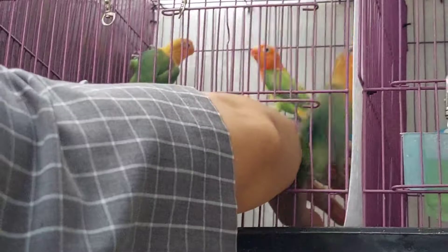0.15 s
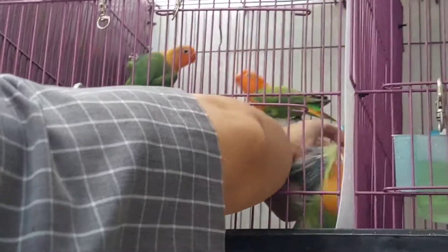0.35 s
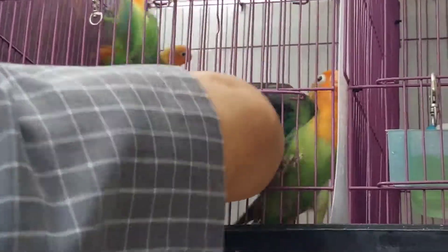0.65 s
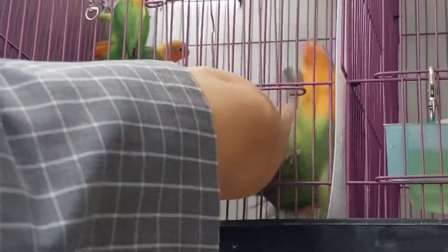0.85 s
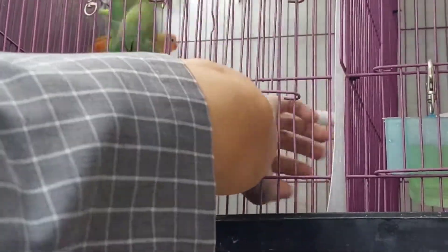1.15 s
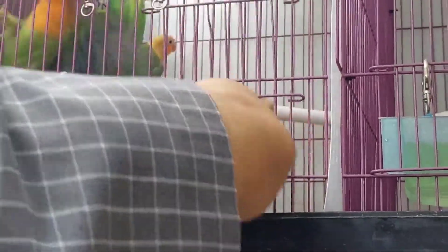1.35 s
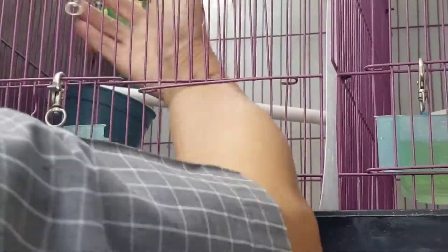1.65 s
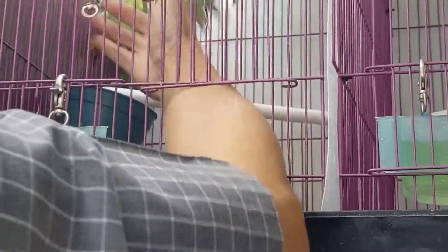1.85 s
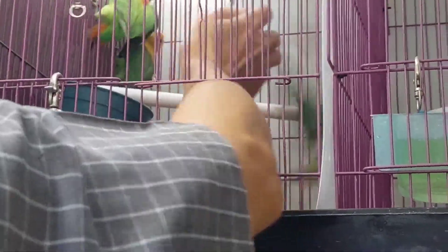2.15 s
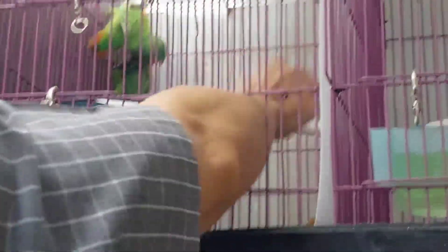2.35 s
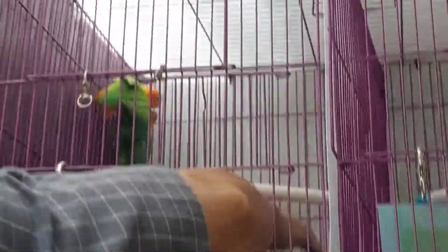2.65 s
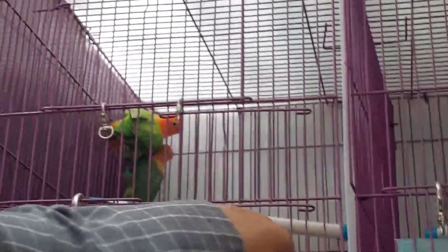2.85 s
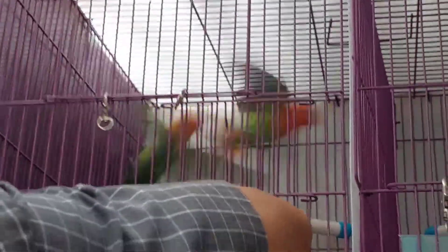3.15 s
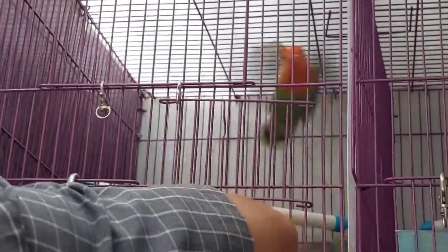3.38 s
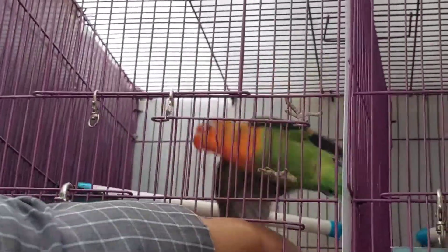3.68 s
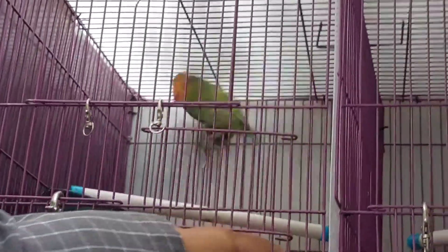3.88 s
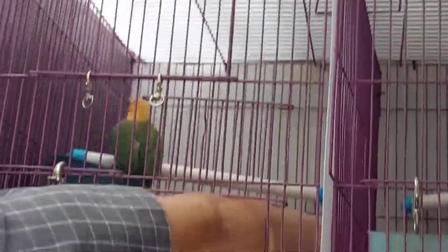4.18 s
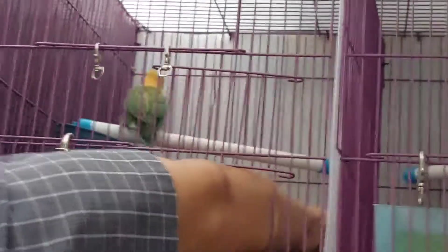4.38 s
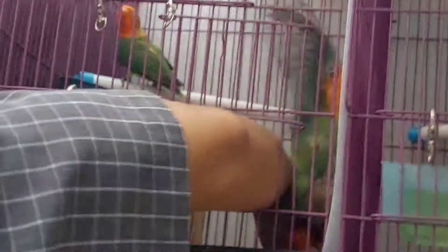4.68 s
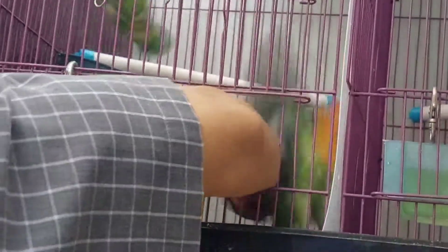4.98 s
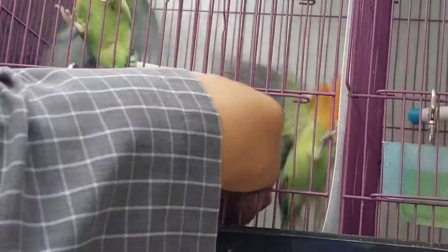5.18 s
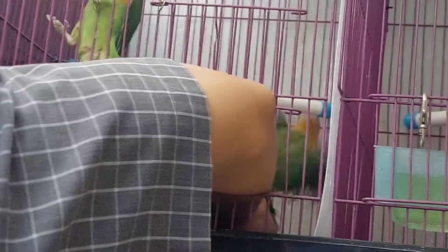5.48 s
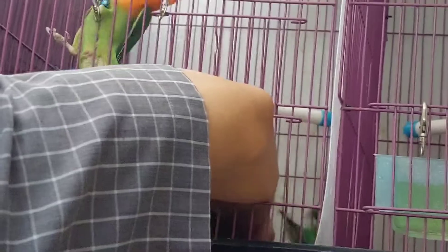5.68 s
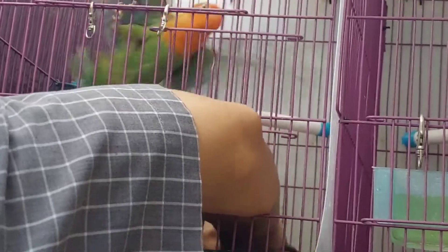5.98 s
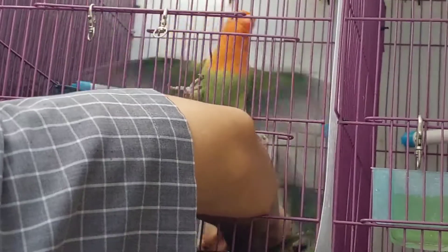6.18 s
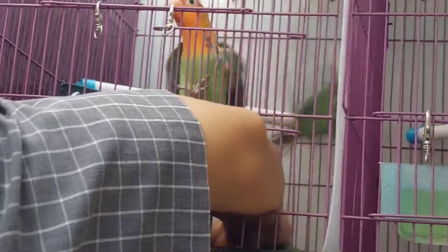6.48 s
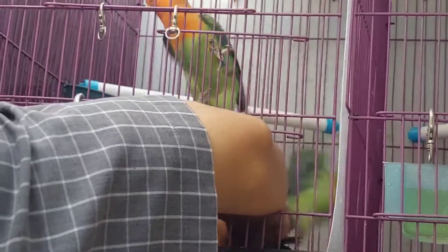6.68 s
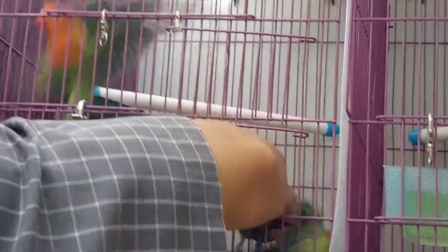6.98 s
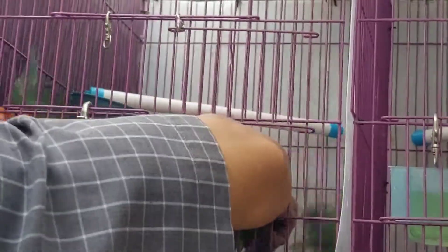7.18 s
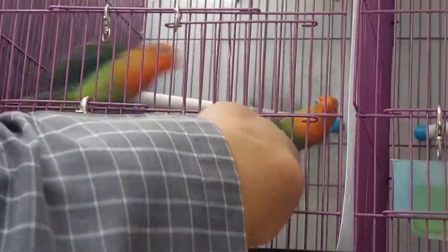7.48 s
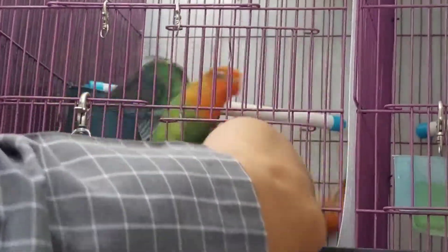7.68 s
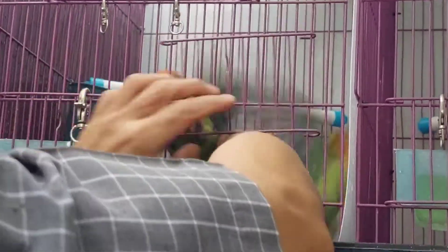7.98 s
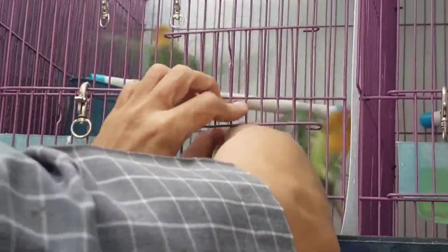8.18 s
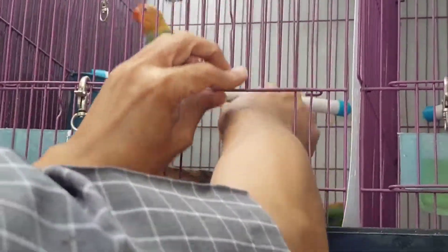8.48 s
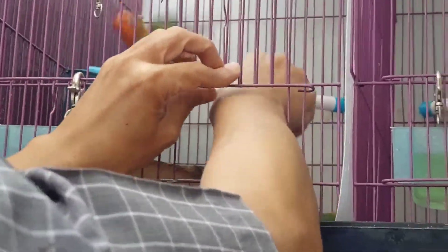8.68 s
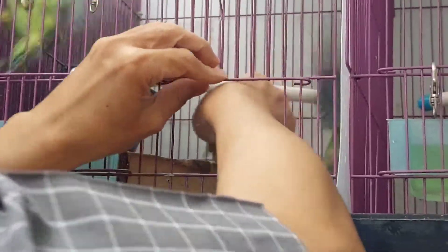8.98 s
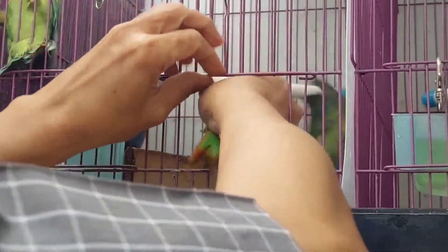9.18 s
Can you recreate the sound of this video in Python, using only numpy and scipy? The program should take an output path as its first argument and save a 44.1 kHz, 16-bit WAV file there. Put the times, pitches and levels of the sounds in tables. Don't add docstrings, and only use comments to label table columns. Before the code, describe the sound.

In a hard-walled room, small parrots panic in a wire cage very near two microphones. Two raspy rising screeches open at 0 and 0.3 s, with wing blows between them, then a short call at 1.05 and another at 1.7. A second bird gives leaping, purer whistles at 2.1 and 2.3. Screeches return at 2.6, 2.9, 3.2 and 3.8, with a dense flurry of slaps around 3.5-3.8 and a brief high chirp near 4.0. A tiny claw squeak on wire at 4.7 precedes rapid screeching from 4.8 to 8.2, wings slapping bars and thumping the tray, notably around 7.4-7.7. A faint, very high whistle comes at 8.25, more blows at 8.8-9.0, final screeches at 9.0 and 9.3. Airy flutter and feather rustle fill gaps. One distant engine fades by 1.3 s; another swells to about 4 and disappears by 5.5, over soft low room noise.

```python
import sys
import numpy as np
from scipy import signal
from scipy.fft import rfft, irfft, next_fast_len
from scipy.io import wavfile
from scipy.ndimage import uniform_filter1d

SR = 44100
rng = np.random.default_rng(int(sys.argv[2]) if len(sys.argv) > 2 else 0)


def generate_wav(sig):
    pcm = np.round(np.clip(np.atleast_2d(sig).T, -1, 1) * 32767).astype(np.int16)
    wavfile.write(sys.argv[1], SR, pcm)


def ratio_of_db(decibels):
    return 10 ** (np.asarray(decibels, float) / 20)


N = 411894

# t/s, firing f/Hz, level/dB, upper orders level/dB
DRONE = [
    (0.0, 63.9, -62, -58),
    (1.15, 67.45, -43, -48),
    (3.84, 62.94, -33, -51.5),
    (5.5, 63.5, -105, -57),
]
# multiple of firing f, level/dB
DRONE_ORDERS = [(2, 5), (2.5, -16), (3, 0)]
# t/s, f/Hz, level/dB
PASSING_ENGINE = [
    (0.0, 85, -45),
    (1.26, 84.5, -60),
    (1.3, 83, -68),
]
# f/Hz, level/dB
FLOOR = [(15, -34), (25, -10), (65, 11), (158, -2.5), (431, -7), (922, -30), (1240, -32.5), (1390, -21.5),
         (4570, -48.5), (14300, -41), (16400, -48.5)]
# f/Hz, likeness (0-1)
LIKENESS = [(60, .97), (170, .92), (330, .66), (640, .12), (15000, .02)]

# t/s, wing air level/dB, feather contact with the wire level/dB
FLUTTER = [(0.29, -31, -22), (0.88, -59, -14.5), (1.15, -45, -13.5), (2.35, -36.5, -15), (2.56, -51, -24),
           (2.7, -37.5, -22), (3.12, -48.5, -8), (3.33, -32, -5), (4.04, -35.5, -27), (4.62, -53.5, -15),
           (4.71, -31.5, -15.5), (5.53, -35.5, -16), (6.01, -48, -10), (6.8, -34.5, -11.5),
           (8.17, -39.5, -16), (8.8, -53, -16), (9.05, -27, -15.5), (9.3, -44.5, -18)]
# f/Hz, level/dB
WING_AIR = [(53, -10), (100, -2), (294, -0.5), (881, -12.5), (2500, -16.5), (4000, -62.5)]
# f/Hz, level/dB
FEATHERS = [(530, 9), (900, 0), (2000, 6.5), (2490, -2.5), (2820, 3.5), (7170, -4), (15200, -2),
            (16400, -49)]

# t/s, length/s, effort level/dB, low f/Hz, top f/Hz
SCREECHES = [(0.021, 0.17, -10, 1617, 2890), (0.332, 0.16, -14.5, 1642, 3055),
             (1.049, 0.053, -25.5, 2102, 2695), (1.678, 0.13, -15.5, 1643, 2846),
             (2.603, 0.2, -19, 1400, 3026), (2.926, 0.2, -19, 1470, 2766), (3.214, 0.18, -21, 1539, 2758),
             (3.845, 0.16, -17, 1728, 2648), (4.835, 0.19, -14.5, 1537, 2688),
             (5.147, 0.125, -13.5, 1658, 2516), (5.42, 0.095, -16, 1652, 2615),
             (5.777, 0.15, -16, 1568, 2785), (6.297, 0.19, -19.5, 1406, 2857),
             (6.61, 0.074, -11.5, 1710, 2492), (6.842, 0.15, -15, 1517, 2795),
             (7.152, 0.17, -17.5, 1532, 2662), (7.426, .13, -16, 1490, 2685),
             (7.835, 0.14, -18, 1470, 2594), (8.117, 0.12, -17, 1439, 2523),
             (8.994, 0.18, -15.5, 1504, 2768), (9.307, 0.13, -17.5, 1476, 2700)]
# low note/s, rise/s, last f as share of top, overtone level/dB, windpipe ring level/dB
GLIDES = [(0.045, 0.085, 0.81, -3.5, -2.5), (0.025, .11, 0.68, -5.5, -3), (0.02, 0.033, 1, -6, 12.5),
          (0.038, 0.039, 0.55, -3.5, 2), (0.075, 0.075, 0.6, -1, 1.5), (0.041, .11, 1, -3.5, -1),
          (0.05, 0.1, 0.46, -2, 0.5), (0.055, .068, 0.69, -2, -1), (0.08, 0.065, 0.68, -0.5, 0.5),
          (0.033, 0.061, 0.6, -2.5, 0), (0.032, 0.041, 0.85, -6, -1), (0.062, .052, .6, -5, -0.5),
          (0.065, 0.088, 0.75, -5.5, 8), (.042, 0.034, 1, -3.5, -5.5), (0.023, .115, 0.33, -4, -0.5),
          (0.066, 0.059, .9, -5, 1.5), (0.044, .065, 0.9, -5, -0.5), (0.054, 0.042, 0.98, -5.5, -2),
          (0.037, 0.06, 0.63, -2.5, -1.5), (.066, 0.069, 0.3, -4.5, 8.5), (0.034, 0.055, .85, -3, 7)]
# peak as share of rise, start level/dB, sag/dB, fundamental level/dB
PUSHES = [(0.037, -22.5, -13, -6), (0.17, -16.5, -5, -10.5), (0.46, -15, -1, -11),
          (0.24, -8.5, -10.5, -8.5), (0.15, -19, -4.5, -11), (0.32, -12, -1, -6.5), (0.12, -3, -3.5, -10),
          (0.18, -3.5, -1.5, -10), (0.22, -20, -5, -6), (0.67, -21, -11.5, -6.5), (0.64, -11.5, -9.5, -4.5),
          (1, -18, -1, -11.5), (.3, -15, -6, -7.5), (0.46, -19.5, -4.5, -8.5), (0.22, -10.5, -2.5, -7),
          (0.4, -16, -4.5, -10.5), (0.92, -18, -2.5, -13), (0.27, -15.5, 1, -14.5), (0.68, -16, -3, -9.5),
          (0.23, -12, -5, -10.5), (.3, -13, -3.5, -10)]
LATENESS = [1.8, 1.8, 1.8, 1.5, 2.2, 1.8, 2.2, 1.4, 1.8, 1.6, 1.8, 2.2, 1.8, 1.8, 1.8, 1.8, 1.8, 1.8, 1.8,
            3.6, 1.8]
HASTE = [1.7, 3, 1.7, 1.3, 1.3, 1.4, 0.89, 1.2, 1.2, 1.1, 1.5, 1.4, 1.2, 1.3, 1, 1.3, 1.2, 1.3, 1.3, 1.3,
         1.3]
ROUGHNESS = [.55, .55, .43, .43, .4, .4, .45, .4, .4, .38, .36, .32, .24, .4, .4, .38, .32, .3, .38, .22,
             .3]
CHOP_RATES = [230, 270, 270, 270, 230, 250, 270, 270, 270, 270, 270, 250, 270, 270, 270, 270, 200, 100, 270,
              130, 270]
# f/Hz, level/dB
THROAT = [(590, -60), (1150, -30.5), (1450, -3.5), (2240, -7), (3040, -2.5), (4730, -2), (5600, -10),
          (6400, -12), (9220, -18), (10600, -14.5), (13900, -13.5), (15800, -39), (16400, -53)]

# t/s, feather snap level/dB, thump relative to it/dB
BLOWS = [(0.2432, -25, -2), (0.3184, -24, -3.5), (1.037, -19, -11.5), (1.2801, -25.5, -6),
         (1.5569, -31, -13), (1.6614, -24.5, -1), (2.1893, -26.5, -7), (2.6142, -26, -2),
         (3.1664, -25.5, -1), (3.5512, -21.5, -4), (3.6072, -20, -6), (3.6701, -30, 5), (3.8291, -22.5, -9),
         (4.1045, -25, -5.5), (4.2437, -22, -4.5), (4.6629, -27, 2), (4.7921, -18.5, -7),
         (5.3956, -21.5, -11), (6.3048, -18.5, -6.5), (6.6187, -22.5, -3), (7.364, -23.5, -1),
         (7.4067, -25.5, 0), (7.671, -25.5, 2), (7.707, -22.5, 5), (7.722, -27, -2), (8.101, -21, -2.5),
         (8.5613, -38.5, 1), (8.8286, -23, -8.5), (8.8819, -39, 9.5), (8.8934, -23.5, -60),
         (8.9706, -24, -15), (2.6005, -34.5, -18), (8.9575, -30, -10)]
# t/s, feather snap level/dB
BRUSHES = [(0.6519, -30.5), (0.988, -34), (1.16, -28), (1.211, -30), (1.353, -28.5), (1.4339, -52),
           (1.499, -28.5), (1.627, -30), (1.933, -27.5), (2.0443, -23.5), (2.27, -27.5), (3.459, -19),
           (3.9953, -18), (4.023, -17.5), (4.314, -35), (4.419, -36.5), (1.79, -20), (1.82, -20.5),
           (5.257, -29), (5.3336, -32), (6.097, -33), (5.648, -57), (5.73, -57), (6.047, -44), (6.156, -26),
           (6.217, -37), (6.759, -27.5), (6.8197, -19), (7.135, -30.5), (8.2412, -18.5), (9.2853, -32.5)]
# f/Hz, level/dB, t60/s
TRAY_MODES = [(219.4, 1, 0.35), (307.2, 0, 0.31), (406.5, 1, 0.2), (591, -2.5, 0.21), (875, 7, 0.068),
              (1380, 7.5, 0.04)]

# t/s, effort level/dB, f/Hz, rasp (0-1)
WHISTLES = [
    [(2.058, -24, 2200, .95), (2.086, -18.5, 2856, .6), (2.096, -12.5, 2894, .1), (2.099, -5.5, 4330, .1),
     (2.113, -11.5, 4215, .1), (2.117, -13, 4820, .1), (2.138, -10.5, 4280, .15), (2.142, -18.5, 2997, .1),
     (2.16, -26.5, 2965, .15)],
    [(2.303, -21.5, 2030, .5), (2.315, -20, 2800, .4), (2.318, -8, 3790, .15), (2.336, -15, 4250, .15),
     (2.353, -15.5, 4450, .15), (2.366, -16.5, 3400, .2), (2.374, -10.5, 3894, .1),
     (2.392, -17.5, 4030, .15), (2.405, -32, 4250, .15)],
    [(4.031, -10, 4570, 0.9), (4.041, -28, 4590, 0.6), (4.051, -13, 5810, 0.4), (4.07, -20.5, 5290, 0.3),
     (4.077, -35.5, 5020, 0.3)],
    [(8.257, -24, 5660, .2), (8.266, -22, 6285, .1), (8.28, -24, 6190, .1), (8.3, -19, 6220, .1)],
]
# second level/dB, third level/dB
WHISTLE_OVERTONES = [(-13, -16.5), (-13, -15), (-13.5, -31.5), (0, -40)]

# t/s, length/s, slip f/Hz, level/dB
SQUEAK = (4.736, .028, 762, -38)
# f/Hz, level/dB
SQUEAK_COLOUR = [(700, -25), (1530, -2), (5300, -8), (12800, -17)]

# f/Hz, t60/s
ROOM = [(200, 0.99), (2000, 0.52), (5000, 0.5), (12000, 0.46)]
# f/Hz, left-right level/dB
SHADOW = [(240, -2), (950, -1.5), (3770, -.5), (15000, -3)]


def evened(x):
    return x / np.sqrt(np.mean(x ** 2) + 1e-20)


def read(points, hz):
    f, value = np.transpose(points)
    return np.interp(np.log(hz + 1), np.log(f + 1), value)


def add(mix, s, sound):
    part = mix[..., round(s * SR):][..., :sound.shape[-1]]
    part += sound[..., :part.shape[-1]]


def curve(rows):
    s, *columns = np.transpose(rows)
    t = np.arange(s[0], s[-1], 1 / SR)
    return [np.interp(t, s, c) for c in columns]


def whole(rows):
    s, *columns = np.transpose(rows)
    return [np.interp(np.arange(N) / SR, s, c) for c in columns]


def drift(count, hz):
    size = next_fast_len(max(count, SR // 4), real=True)
    spectrum = rfft(rng.standard_normal(size))
    smooth = np.exp(-(np.fft.rfftfreq(size, 1 / SR) / hz) ** 2)
    return evened(irfft(spectrum * smooth, size)[:count])


def hiss(points, patchy_db):
    frames, hz = N // 128 + 5, np.fft.rfftfreq(512, 1 / SR)
    a, b, c, d, patches = rng.standard_normal((frames, 257, 5)).T
    patches = uniform_filter1d(patches, size=10, axis=0)
    patches = evened(uniform_filter1d(patches, size=8, axis=1))
    same = np.clip(read(LIKENESS, hz), -1, 1)[:, None]
    left = a + 1j * b
    right = same * left + np.sqrt(1 - same ** 2) * (c + 1j * d)
    z = np.array([left, right]) * ratio_of_db(read(points, hz)[:, None] + patchy_db * patches)
    return evened(signal.istft(z, nperseg=512, noverlap=384)[1][:, :N])


def engines():
    out = np.zeros(N)
    hz, db, upper_db = curve(DRONE)
    turns = np.cumsum(hz) / SR
    upper = sum(ratio_of_db(order_db) * np.sin(2 * np.pi * k * turns) for k, order_db in DRONE_ORDERS)
    tone = ratio_of_db(db + 5.0) * np.sin(2 * np.pi * turns) + ratio_of_db(upper_db) * upper
    waver = ratio_of_db(2.2 * drift(count=len(hz), hz=3.7))
    add(out, 0, tone * waver * signal.windows.tukey(len(hz), .05))
    hz, db = curve(PASSING_ENGINE)
    tone = ratio_of_db(db + 9) * np.sin(2 * np.pi * np.cumsum(hz) / SR)
    add(out, 0, tone * signal.windows.tukey(len(hz), .2))
    return out


def flutter():
    air_db, contact_db = whole(FLUTTER)
    beat_db = 3 * drift(count=N, hz=40)
    lumps_db = np.clip(2.4 * drift(count=N, hz=25), -5, 3.5)
    air = ratio_of_db(air_db - 2.5 + lumps_db) * hiss(WING_AIR, patchy_db=1.0)
    rustle = ratio_of_db(air_db + contact_db + 9.5 + beat_db) * hiss(FEATHERS, patchy_db=2.0)
    return air + rustle


def breath(count):
    size = next_fast_len(max(count, SR // 4), real=True)
    air = rfft(rng.standard_normal(size))
    throat = ratio_of_db(read(THROAT, np.fft.rfftfreq(size, 1 / SR)))
    return evened(irfft(air * throat, size)[:count])


def contour(length, effort_db, low_hz, top_hz, held, glide, last, ring_db,
            peak_at, start_db, sag_db, late, haste):
    attack_s, held_db = 0.028, -6.5
    ring_hz, ring_width_hz, pull = 2216, 190, .95
    t = np.arange(0, length, 1 / SR)
    up = np.clip((t - held) / glide, 0, 1)
    up = 1 - (1 - up) ** max(haste, 1)
    down = np.clip((t - held - glide) / max(length - held - glide, .005), 0, 1) ** late

    peak = held + np.clip(peak_at, .02, 1) * glide
    times = [0, min(attack_s, held), peak, max(length, peak + .005)]
    shape_db = np.interp(t, times, [start_db, held_db, 0, sag_db])

    low_hz = low_hz * (1 + .06 * np.minimum(t / held, 1))
    hz = (low_hz + (top_hz - low_hz) * up) * (1 - (1 - last) * down)
    off = (hz - ring_hz) / ring_width_hz
    surge_db = 0.7 * drift(count=len(t), hz=45.4)
    shape_db = shape_db + ring_db * np.exp(-off ** 4) + surge_db
    caught = pull * np.clip(0.397 + ring_db / 13, 0, 1) * np.exp(-(off / 2) ** 4)
    return effort_db + shape_db, hz - caught * (hz - ring_hz)


def screech(effort_db, hz, rough, chop_hz, low_db, high_db):
    n = len(hz)
    rough = np.clip(rough * (2200 / hz), .15, 1)
    hz = hz * (1 + .068 * rough * drift(count=n, hz=350) + .022 * drift(count=n, hz=70))
    turns = np.cumsum(hz) / SR
    chop_turns = np.cumsum(chop_hz * (1 + 0.2934 * drift(count=n, hz=58.8))) / SR
    chop = np.cos(2 * np.pi * chop_turns)
    tone = 0
    for k in range(1, 10):
        tilt_db = low_db if k == 1 else high_db * (k > 2)
        tilt_db = tilt_db + 3.2 * drift(count=n, hz=45)
        level = ratio_of_db(read(THROAT, k * hz) + tilt_db) * (k * hz < 17000)
        flicker = 1 + rough * (1.97 * chop + 0.19 * drift(count=n, hz=253))
        tone = tone + level * flicker * np.cos(2 * np.pi * k * turns)
    tone = tone / np.sqrt(uniform_filter1d(tone ** 2, size=900) + 1e-9)
    puffs = (1 + 2.8 * chop) * breath(count=n)
    voice = tone + ratio_of_db(-15.0 + 2 * high_db) * rough * puffs
    return ratio_of_db(effort_db + 0.5) * voice * signal.windows.tukey(n, .08)


def placed(call, pan_db, direct_db):
    left_at, right_at = 21, 4
    t = np.arange(900) / SR
    turn = np.linspace(0, np.pi / 2, len(call))
    out = 0
    for fade in (np.cos(turn), np.sin(turn)):
        sparse = rng.random((2, 900)) < .08
        walls = rng.standard_normal((2, 900)) * sparse * ratio_of_db(-60 * t / 0.05)
        walls *= ratio_of_db(2.0) / np.linalg.norm(walls, axis=1, keepdims=True)
        walls[0, left_at] += ratio_of_db(direct_db + pan_db / 2)
        walls[1, right_at] += ratio_of_db(direct_db - pan_db / 2)
        out = out + signal.fftconvolve((call * fade)[None], walls, axes=1)
    return out


def screeches():
    out = np.zeros((2, N))
    rows = zip(SCREECHES, GLIDES, PUSHES, LATENESS, HASTE, ROUGHNESS, CHOP_RATES)
    for (s, *call), (*glide, high_db, ring_db), (*push, low_db), late, haste, rough, chop_hz in rows:
        effort_db, hz = contour(*call, *glide, ring_db, *push, late, haste)
        voice = screech(effort_db, hz, rough, chop_hz, low_db, high_db)
        add(out, s, placed(voice, pan_db=4, direct_db=-8.0))
    return out


def slaps():
    snap, thump = np.zeros(N), np.zeros(N)
    t = np.arange(6000) / SR
    strokes = BLOWS + [(s, db, -10 - max(db + 28, 0)) for s, db in BRUSHES]
    chance = rng.random((len(strokes), 3 * len(TRAY_MODES) + 1))
    for (s, db, thump_db), (long, *luck) in zip(strokes, chance):
        onset = 1 - np.exp(-t / (.002 + .003 * long))
        add(snap, s - .001, ratio_of_db(db - 60 * t / (.07 + .05 * long)) * onset)
        ring = 0
        for (hz, mode_db, t60), (a, b, c) in zip(TRAY_MODES, np.reshape(luck, (-1, 3))):
            detuned_hz = hz * (0.9055 + 0.2627 * b)
            ring = ring + ratio_of_db(mode_db - 4.3 * a - 60 * t / t60) * np.sin(2 * np.pi * (detuned_hz * t + c))
        add(thump, s - .002, ratio_of_db(db + thump_db - 6.5) * ring * (1 - np.exp(-t / 0.0078)))
    crackle = ratio_of_db(2.2 * drift(count=N, hz=490))
    return ratio_of_db(-0.5) * snap * crackle * hiss(FEATHERS, patchy_db=1.2) + thump


def whistle(rows, second_db, third_db):
    effort_db, hz, rasp = curve(rows)
    n = len(hz)
    rasp = np.clip(rasp, .13, 0.24 + .7 * (hz < 3000))
    turns = np.cumsum(hz * (1 + 0.11 * rasp * drift(count=n, hz=380))) / SR
    second_db = second_db + 9 * np.clip((3700 - hz) / 600, 0, 1)
    tone = 0
    for k, db in ((1, 0.0097), (2, second_db), (3, third_db)):
        tone = tone + ratio_of_db(db) * np.cos(2 * np.pi * k * turns) * (k * hz < 17000)
    tone = tone * (1 + 0.65 * drift(count=n, hz=240))
    voice = np.clip(1 - rasp, .1, 1) * tone + (0.05 + 0.46 * rasp) * breath(count=n)
    return ratio_of_db(effort_db - 4.0) * voice * signal.windows.tukey(n, .1)


def whistles():
    out = np.zeros((2, N))
    for rows, overtones in zip(WHISTLES, WHISTLE_OVERTONES):
        add(out, rows[0][0], placed(whistle(rows, *overtones), pan_db=0.61, direct_db=1.5))
    return out


def squeak():
    s, length, hz, db = SQUEAK
    t, out = np.arange(0, length, 1 / SR), np.zeros(N)
    turns = np.cumsum(hz * (1 + .012 * drift(count=len(t), hz=300))) / SR
    clicks = 0
    for k in range(1, 18):
        clicks = clicks + ratio_of_db(read(SQUEAK_COLOUR, k * hz)) * np.cos(2 * np.pi * k * turns + k * k)
    add(out, s, ratio_of_db(db) * evened(clicks) * signal.windows.tukey(len(t), .3))
    return out


def room(x, first, t60_scale):
    taps = np.zeros((2, SR // 2))
    at = np.arange(first, SR // 2 - 20, 20)
    at = at + rng.integers(0, 20, (2, len(at)))
    np.put_along_axis(taps, at, rng.choice([-1., 1.], at.shape), 1)
    hz, t, z = signal.stft(taps, SR, nperseg=256)
    decay = ratio_of_db(-60 * t / (t60_scale * read(ROOM, hz)[:, None]))
    tail = signal.istft(z * decay, SR, nperseg=256)[1]
    return signal.fftconvolve(x, tail / np.linalg.norm(tail[0]), axes=1)[:, :N]


def scene():
    calls = screeches() + whistles() + squeak()
    hits = slaps()
    upper = signal.sosfilt(signal.butter(2, 260, "high", fs=SR, output="sos"), hits)
    wet = ratio_of_db(-9.0) * room(calls, first=500, t60_scale=0.5)
    wet = wet + ratio_of_db(-6.) * room(upper, first=200, t60_scale=.85)
    floor = ratio_of_db(-48) * hiss(FLOOR, patchy_db=0.5)
    return calls + wet + hits + flutter() + engines() + floor


def roll_off(x):
    return signal.sosfilt(signal.butter(12, 16500, fs=SR, output="sos"), x)


def record(dry):
    size = next_fast_len(N, real=True)
    hz = np.fft.rfftfreq(size, 1 / SR)
    shading = ratio_of_db(read(SHADOW, hz) * np.array([[.5], [-.5]]))
    bass_cut = 1 / np.sqrt(1 + (48 / (hz + 1)) ** 5)
    heard = irfft(rfft(dry, size) * shading * bass_cut * (hz < 16450), size)[:, :N]
    limited = .9 * np.tanh(heard / .9)
    return roll_off(limited)


dry = scene()
out = record(dry)
generate_wav(out)
```